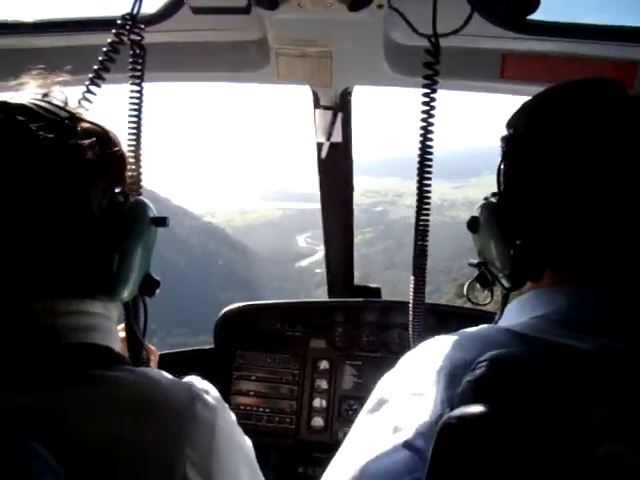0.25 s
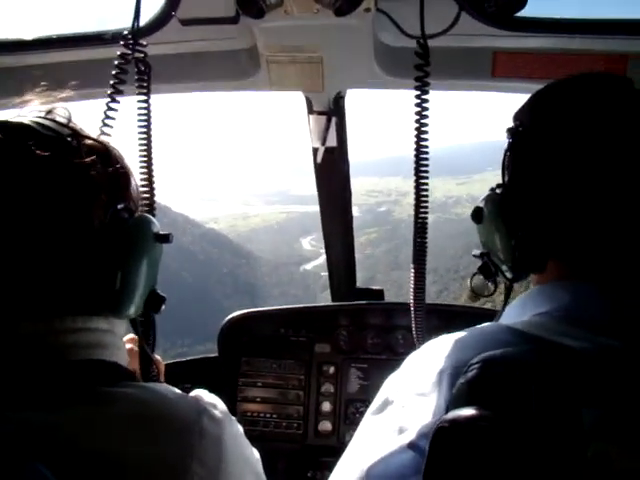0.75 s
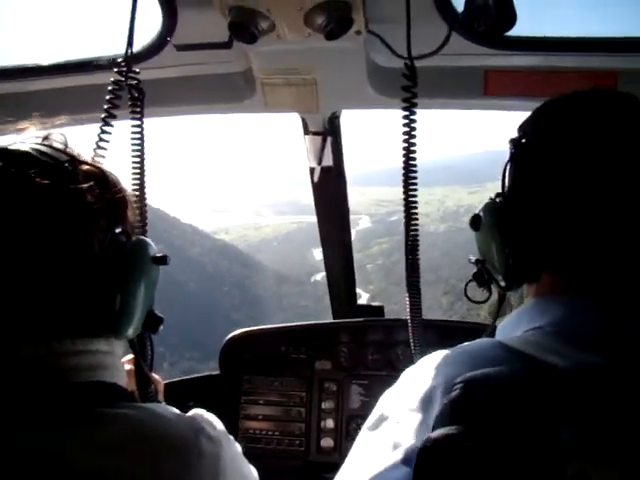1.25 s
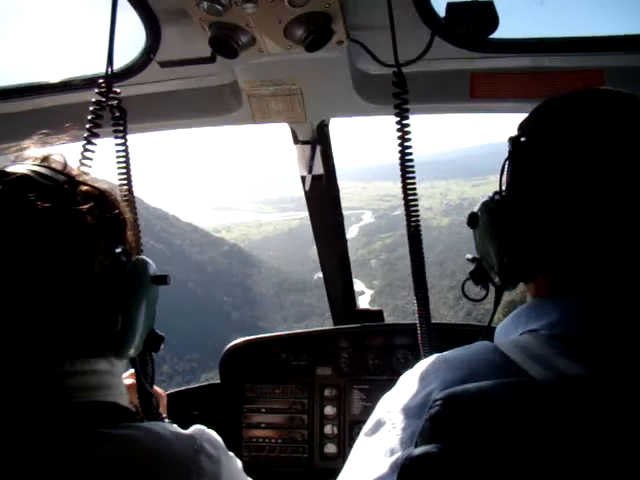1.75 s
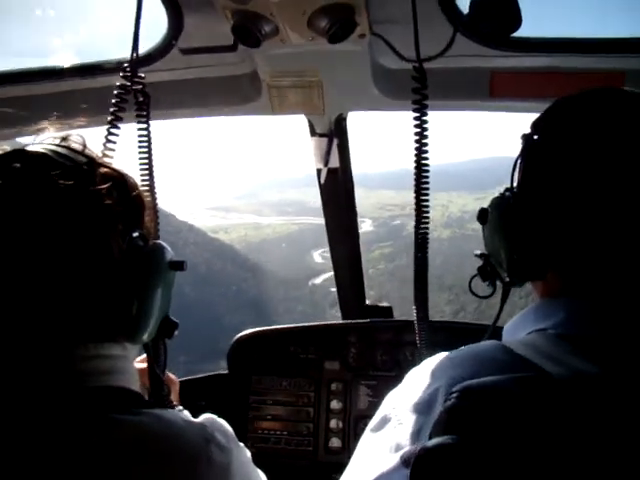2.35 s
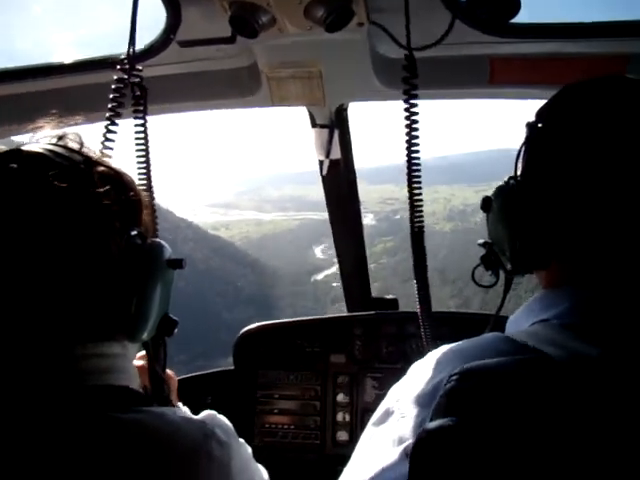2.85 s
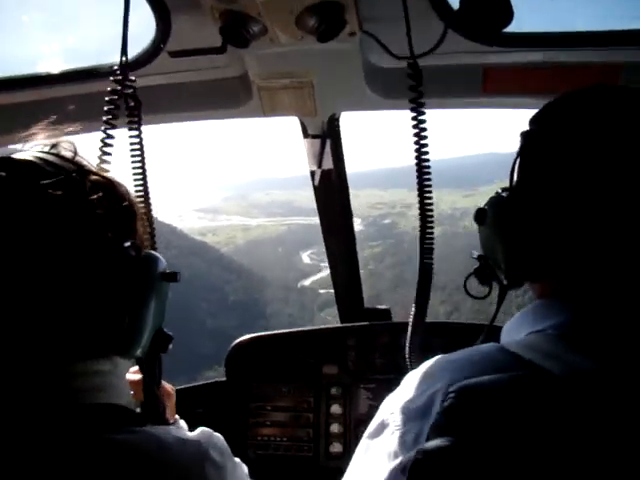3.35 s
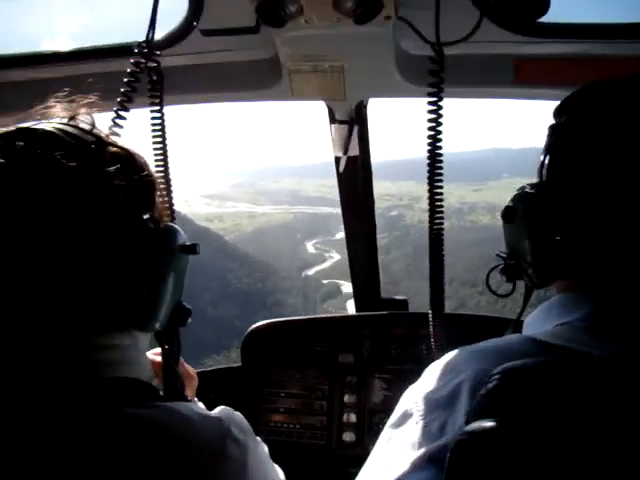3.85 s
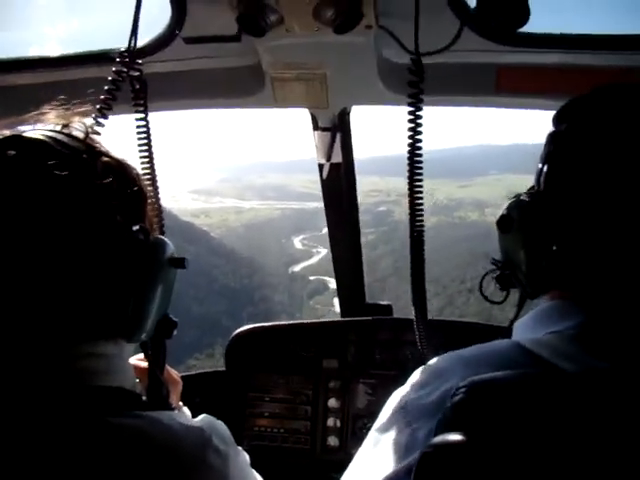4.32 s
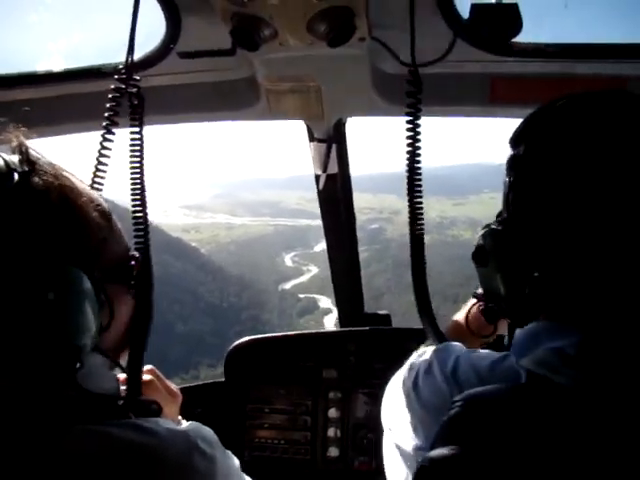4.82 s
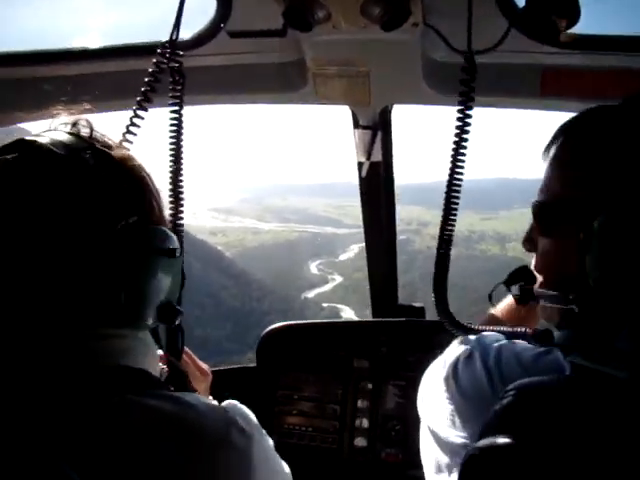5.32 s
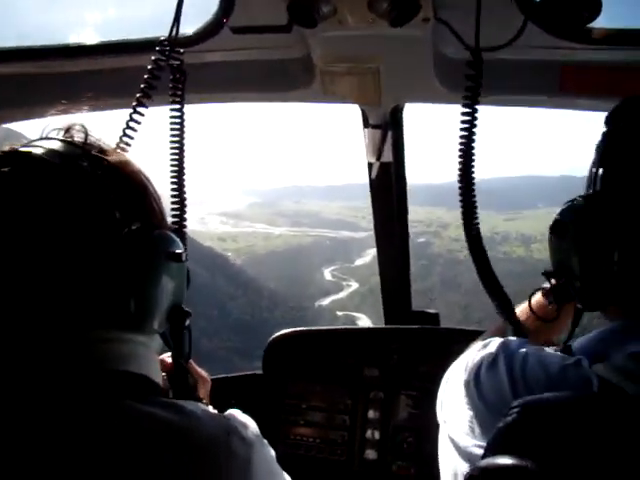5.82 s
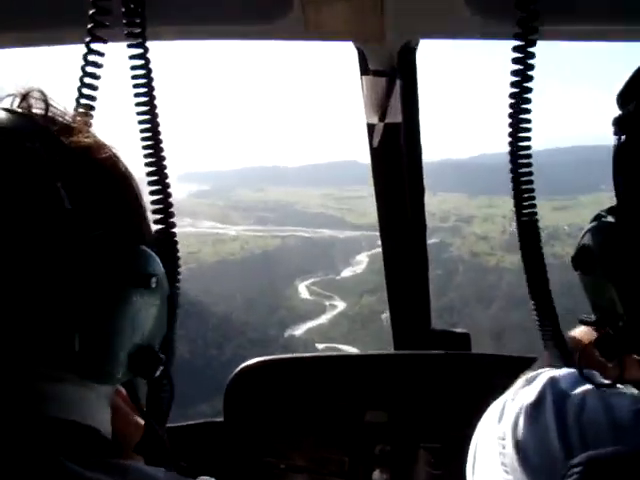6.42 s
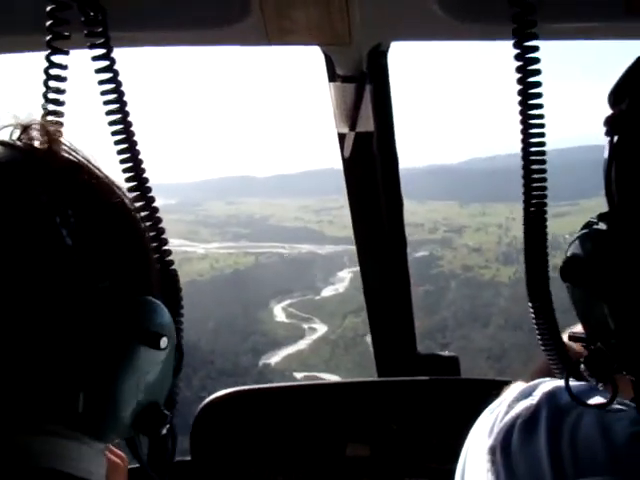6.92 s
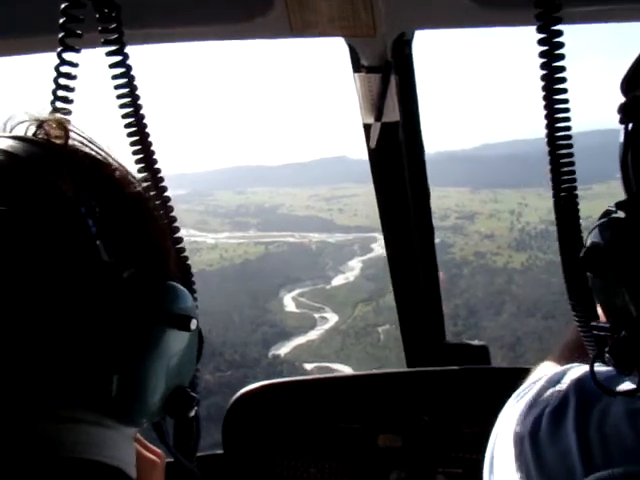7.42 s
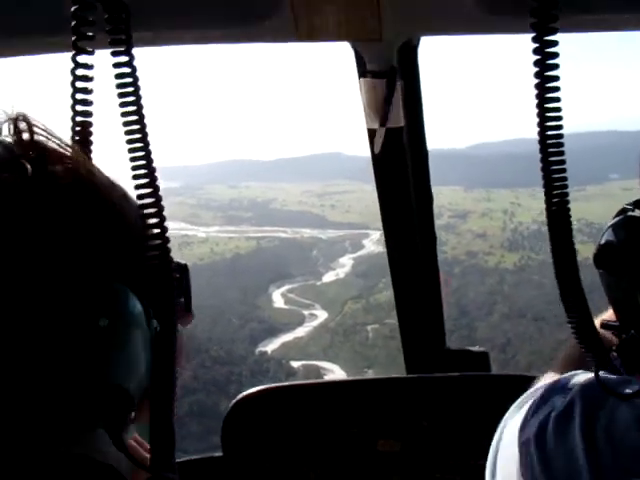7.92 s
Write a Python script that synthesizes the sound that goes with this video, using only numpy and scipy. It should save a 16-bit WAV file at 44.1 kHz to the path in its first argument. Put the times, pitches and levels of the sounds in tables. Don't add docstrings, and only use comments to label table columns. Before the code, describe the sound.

Heard from inside a small helicopter cabin in level flight: a dense, steady rush of air and engine noise, strongest in the midrange, with a fast, shallow blade flutter. Gear whines hold near 660 and 1320 hertz, with thinner ones higher up, wavering slightly in strength and pitch. A small close microphone gives thin bass, evened loudness and slightly grainy treble. Nothing starts or stops.

```python
import sys
import numpy as np
from scipy import signal
from scipy.fft import rfft, irfft
from scipy.io import wavfile
from scipy.ndimage import uniform_filter1d

SR = 44100
rng = np.random.default_rng(int(sys.argv[2]) if len(sys.argv) > 2 else 0)


def magnitude_from_level(level_db):
    exponent = np.asarray(level_db, float) / 20
    return 10 ** exponent


def persist_wave(psi):
    counts = np.round(np.clip(psi, -1, 1) * 32767).astype(np.int16)
    wavfile.write(sys.argv[1], SR, np.atleast_2d(counts).T)


N = 360297

# time in s, main gear mesh in Hz.
SHAFT_SPEED = [(0.0, 662.8), (0.4, 663.1), (1.1, 663.0), (1.85, 657.5), (2.1, 657.0), (2.5, 656.9),
               (3.25, 659.7), (3.75, 662.8), (4.15, 662.4), (4.8, 658.6), (5.05, 657.8), (5.5, 658.5),
               (6.1, 657.6), (6.55, 658.9), (7.3, 658.1), (8.17, 656.7)]
CRUISE_HZ = 658.2
DRIVE_RATIO, MAIN_BLADE_RATIO, TAIL_BLADE_RATIO, ROTOR_RATIO = 2.6445, .02995, .10605, .00998

# frequency in Hz, level in dB per Hz.
ROAR_COLOUR = [(22, -53), (50, -41), (100, -20.5), (170, -17), (330, -9), (370, -7.5), (560, -6), (950, -2),
               (1400, -2.5), (2000, -4), (3500, -7), (4200, -10), (6200, -15), (10000, -20)]
# centre in Hz, width in Hz, gain in dB.
CABIN_MODES = [(322, 23, -3), (550, 35, -0.5), (690, 45, -1.3), (823, 28, -3.2), (942, 37, 0.5),
               (1094, 90, -1.7), (1470, 150, -1.5), (1780, 170, 1.5), (3450, 140, 1.5), (3860, 160, -1),
               (4920, 200, -1.9), (6220, 770, -1.1)]
# centre in s, length in s, change in dB.
AIR_SURGES = [
    (.55, 0.88, -0.8),
    (1.9, 1.0, 0.2),
    (3.2, 0.31, .7),
    (3.9, 1.5, -0.5),
    (4.8, 0.67, 0),
    (5.95, 1.1, 0.5),
    (7.8, 0.94, -0.3),
]
SURGE_SHARES = [0.87, .9, 0.95]
MAIN_PULSE = [(1, .042, -.9), (2, .032, 2.3), (3, .024, 2.0)]
TAIL_PULSE = [(1, .034, .6), (2, .014, 2.9)]

# frequency in Hz, width in Hz, usual level in dB, share of the gusts' swing.
EDGE_TONES = [(444, 25, -43, -1.5), (891.3, 75, -32, 1.1)]
# centre in s, length in s, change in dB.
VENT_GUSTS = [
    (2.0, 0.55, 4.5),
    (2.9, .6, 2),
    (3.7, 1.1, -2),
    (8.0, .8, 2),
]

# multiple of the blade rate, level in dB.
MAIN_BLADE = [(1, -78), (2, -68.5), (3, -59.5), (4, -63), (5, -64), (6, -63), (7, -61), (8, -63.5),
              (9, -60.5), (10, -64), (12, -56)]
TAIL_BLADE = [(1, -56.5), (2, -49), (3, -57.5), (4, -55.5)]

MESH_DB = [-34, -28, -46, -45.5, -36.5]
# one turn rate below in dB, one above in dB (re harmonic).
SIDE_TONES = [(-16, -12.5), (-14.5, -13.5), (-15, -6), (-8, 6.5), (-10, -10)]
# centre in s, length in s, change in dB.
FIRST_SHIFTS = [
    (1.4, 1, 1.5),
    (3.4, 1.6, 2),
    (5.4, 1.4, 0),
    (7.6, 2.5, 3),
]
SECOND_SHIFTS = [
    (.68, 0.4, -2.5),
    (1.85, .7, -4),
    (2.6, 0.61, -8),
    (3.2, .4, -4),
    (3.95, 0.69, 2),
    (7.6, 2.0, -5),
]
THIRD_SHIFTS = [
    (1.25, 1.1, 10),
    (2.8, .8, 5),
    (5.9, 1.0, 8),
    (7.4, 3.4, 12),
]
FIFTH_SHIFTS = [
    (2.3, 2.1, -15.5),
    (3.7, .6, -10),
    (7.3, 1.4, -12),
]
DRIVE_SHIFTS = [
    (.35, 1.2, 4.5),
    (1.6, 1.2, -8),
    (2.4, 1.7, -13),
    (3.4, .5, -0.5),
    (4.65, 0.85, -8),
    (6.5, 0.44, -2),
    (7.8, 1.4, 3.5),
]

# centre in s, low edge in Hz, high edge in Hz, level in dB.
SPLIT_HISS = [(.209, 4200, 5190, -37), (1.485, 7600, 8980, -42), (1.925, 4630, 5700, -38),
              (1.951, 4200, 5190, -38), (2.228, 6260, 7600, -41), (2.785, 4630, 5700, -40),
              (4.551, 5150, 6300, -39), (4.899, 5150, 6300, -39), (6.059, 5150, 6300, -39),
              (6.059, 8270, 9670, -43), (6.084, 4630, 5700, -39), (6.316, 4200, 5190, -39),
              (6.641, 4630, 5700, -39), (7.198, 4630, 5700, -38), (7.198, 8270, 9670, -41),
              (8.056, 5150, 6300, -40)]


def rms_one(x):
    return x / np.sqrt(np.mean(x ** 2) + 1e-20)


def in_time(rows):
    s, *columns = np.transpose(rows)
    return [np.interp(np.arange(N) / SR, s, column) for column in columns]


def shifts(rows):
    s = np.arange(N) / SR
    return sum(db * np.exp(-8 * ((s - centre) / length) ** 2) for centre, length, db in rows)


def drift(rate):
    r = np.exp(-80 * np.pi * rate / SR)
    noise = rng.standard_normal(N // 40 + 2002)
    slow = signal.lfilter([1], [1, -2 * r, r * r], noise)[2000:]
    return np.interp(np.arange(N) / 40, np.arange(len(slow)), rms_one(slow))


def tone(turn, db, flutter_db, wobble):
    start = 2 * np.pi * rng.random()
    level = np.sqrt(2) * magnitude_from_level(db + flutter_db * drift(15.0))
    return level * np.sin(turn + start + wobble * drift(5.5))


def standing_waves(x):
    hz = np.fft.rfftfreq(N, 1 / SR)
    bells_db = sum(db * np.exp(-2 * ((hz - centre_hz) / width_hz) ** 2) for centre_hz, width_hz, db in CABIN_MODES)
    return irfft(rfft(x) * magnitude_from_level(bells_db), N)


def blade_pulse(turn, ratio, rows):
    return sum(depth * np.cos(multiple * ratio * turn + lean) for multiple, depth, lean in rows)


def roar(turn, patchy_db, gusty_db):
    low, middle, high = np.outer(SURGE_SHARES, shifts(AIR_SURGES))
    hz, colour_db = np.transpose(ROAR_COLOUR)
    edges = 20 * 2 ** (np.arange(29) / 3)
    white = rng.standard_normal((2, N))
    gust = 0.22 * drift(3.0) + drift(22) + 1.1 * drift(55)
    out = 0
    for k, (lo, hi) in enumerate(zip(edges, edges[1:])):
        band_pass = signal.butter(2, [lo, hi], "band", fs=SR, output="sos")
        band = signal.sosfilt(band_pass, white[k % 2])
        place = np.log(lo * hi) / 2
        shares = [np.interp(place, np.log([300, 2300, 6500]), row) for row in np.eye(3)]
        surge_db = shares[0] * low + shares[1] * middle + shares[2] * high
        treble = np.interp(place, np.log([1000, 8000]), [.2, 1])
        flutter_db = treble * (gusty_db * gust + patchy_db * drift(17))
        out = out + band * magnitude_from_level(np.interp(place, np.log(hz), colour_db) + surge_db + flutter_db)
    pulse = 1 + blade_pulse(turn, MAIN_BLADE_RATIO, MAIN_PULSE) + blade_pulse(turn, TAIL_BLADE_RATIO, TAIL_PULSE)
    return magnitude_from_level(-18) * rms_one(standing_waves(out) * pulse)


def vent():
    out, gust_db = 0, shifts(VENT_GUSTS)
    for hz, width_hz, db, share in EDGE_TONES:
        r = np.exp(-np.pi * width_hz / SR)
        poles = [1, -2 * r * np.cos(2 * np.pi * hz / SR), r * r]
        breath = np.diff(rng.standard_normal(N + 1))
        whistle = signal.lfilter([1], np.convolve(poles, poles), breath)
        out = out + magnitude_from_level(db + share * gust_db) * rms_one(whistle)
    return out


def rotors(turn):
    main = sum(tone(k * MAIN_BLADE_RATIO * turn, db, flutter_db=4.5, wobble=.2) for k, db in MAIN_BLADE)
    tail = sum(tone(k * TAIL_BLADE_RATIO * turn, db, flutter_db=2.5, wobble=0.16) for k, db in TAIL_BLADE)
    return main + tail


def gears(mesh_hz, turn):
    over_cruise_hz = mesh_hz - CRUISE_HZ
    fourth_db = -0.6 * over_cruise_hz
    moves = [shifts(FIRST_SHIFTS), shifts(SECOND_SHIFTS), shifts(THIRD_SHIFTS), fourth_db, shifts(FIFTH_SHIFTS)]
    out = 0
    for k, (db, move_db, (below_db, above_db)) in enumerate(zip(MESH_DB, moves, SIDE_TONES)):
        for side, side_db in ((0, 0), (-1, below_db), (0.98, above_db)):
            out = out + tone((k + 1 + side * ROTOR_RATIO) * turn, db + move_db + side_db,
                             flutter_db=min(.6 + 0.61 * k, 1.8), wobble=0.13 * (k + 1))
    drive_db = -33 + 1 * over_cruise_hz + shifts(DRIVE_SHIFTS)
    return out + tone(DRIVE_RATIO * turn, drive_db, flutter_db=1.5, wobble=0.14)


def scene():
    mesh_hz = in_time(SHAFT_SPEED)[0]
    turn = 2 * np.pi * np.cumsum(mesh_hz) / SR
    cabin = roar(turn, patchy_db=0.54, gusty_db=0.48) + vent() + rotors(turn) + gears(mesh_hz, turn)
    return np.array([cabin, cabin])


def treble_dropouts(x):
    cutoff_hz, holes_from_hz, hole_db = 9900, 5000, -6.2
    hz, s, cells = signal.stft(x, SR, nperseg=441, noverlap=294)
    bands = cells[:105].reshape(21, 5, -1)
    power = np.sum(np.abs(bands) ** 2, axis=1)
    waver = rms_one(uniform_filter1d(rng.standard_normal(power.shape), size=6, axis=1))
    threshold = magnitude_from_level(2 * (hole_db + 2.6 * waver)) * power.mean(axis=1, keepdims=True)
    kept = (power > threshold) | (hz[:105:5, None] < holes_from_hz)
    kept[-1] = kept[-2]
    cells[:105] = (bands * kept[:, None]).reshape(105, -1)
    gated = signal.istft(cells, SR, nperseg=441, noverlap=294)[1][:N]
    over_hz = np.clip(np.fft.rfftfreq(N, 1 / SR) - cutoff_hz, 0, 500)
    return irfft(rfft(gated) * magnitude_from_level(-70 * (over_hz / 340) ** 2.4), N)


def split_hiss():
    side, hz = np.zeros(N), np.fft.rfftfreq(2048, 1 / SR)
    for s, low_hz, high_hz, db in SPLIT_HISS:
        in_band = (hz > low_hz) * (hz < high_hz)
        hiss = irfft(rfft(rng.standard_normal(2048)) * in_band)
        start = round(s * SR) - 1024
        side[start:start + 2048] += magnitude_from_level(db + 5) * rms_one(hiss) * np.hanning(2048)
    return side * [[1], [-1]]


def microphone(x):
    r = np.exp(-1 / (0.038 * SR))
    power = signal.lfilter([1 - r], [1, -r], x ** 2, zi=[np.mean(x ** 2) * r])[0]
    evened = x * (power / np.mean(power)) ** -.15
    lopsided = evened - .2 * (evened ** 2 - power)
    rounded = 1.4 * np.tanh(lopsided / 1.4)
    bass_cut = signal.butter(4, 180, "high", fs=SR, output="sos")
    return evened + signal.sosfilt(bass_cut, rounded - evened)


def low_pass(x):
    return signal.sosfilt(signal.butter(12, 11260, fs=SR, output="sos"), x)


def record(dry):
    mix = treble_dropouts(microphone(dry[0])) + split_hiss()
    return low_pass(mix)


dry = scene()
out = record(dry)
persist_wave(out)
```